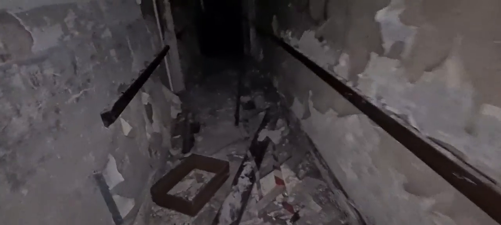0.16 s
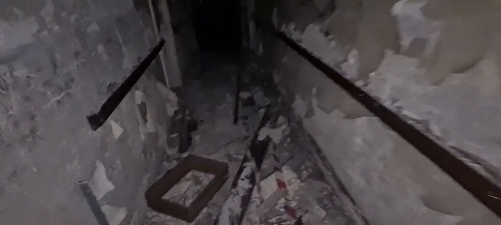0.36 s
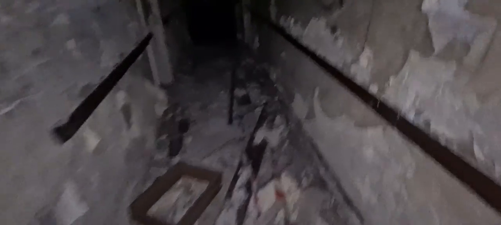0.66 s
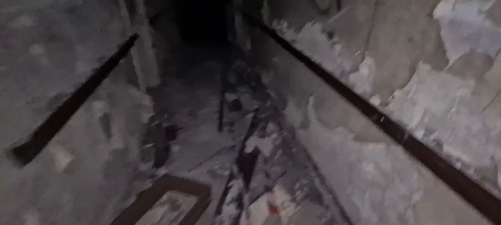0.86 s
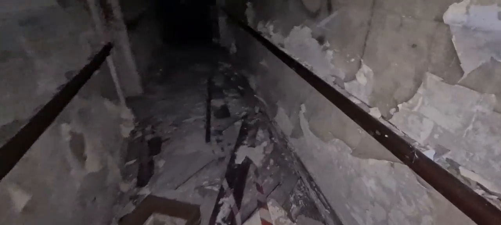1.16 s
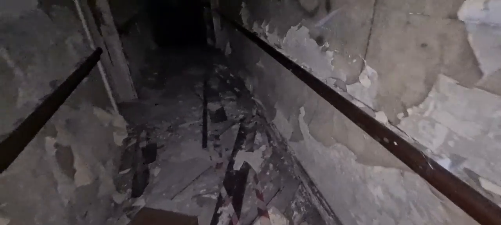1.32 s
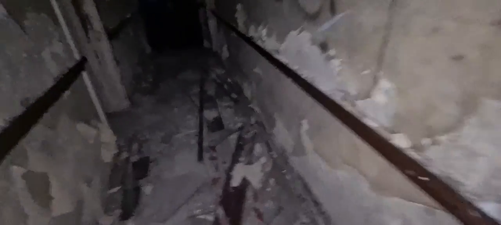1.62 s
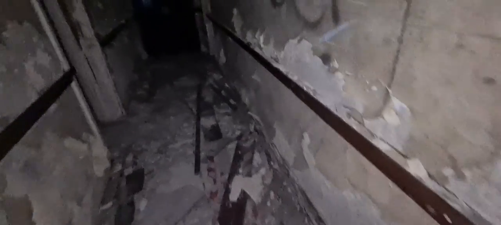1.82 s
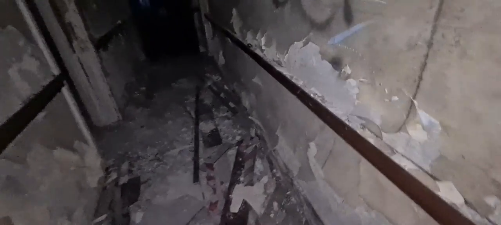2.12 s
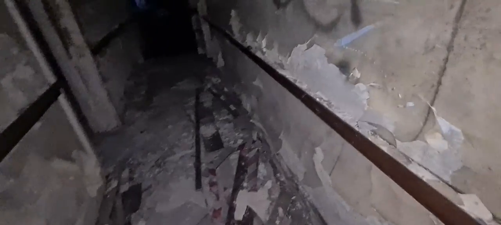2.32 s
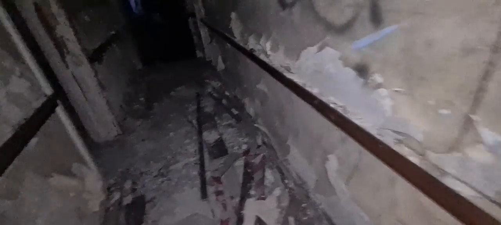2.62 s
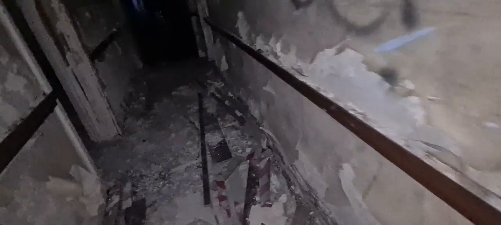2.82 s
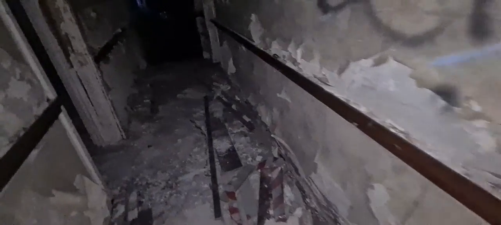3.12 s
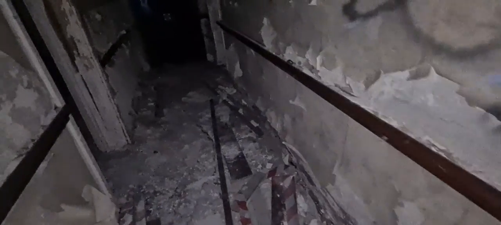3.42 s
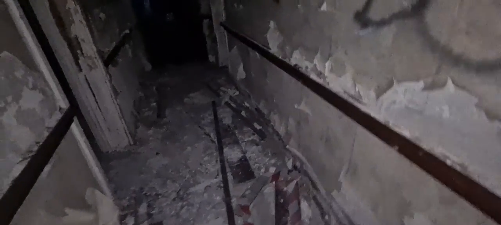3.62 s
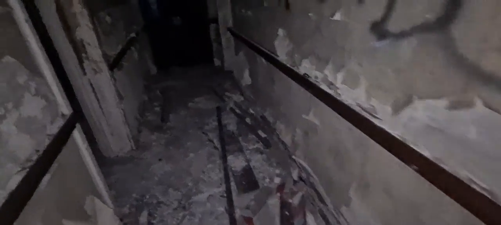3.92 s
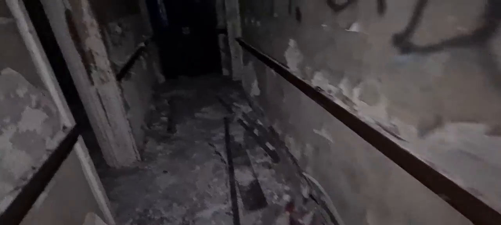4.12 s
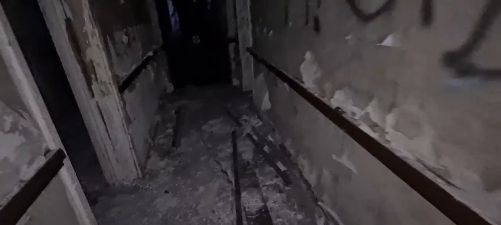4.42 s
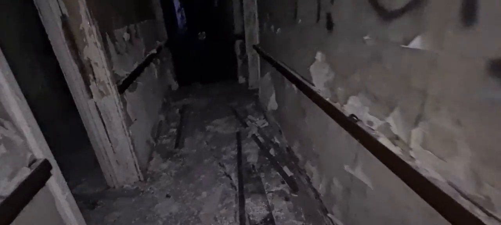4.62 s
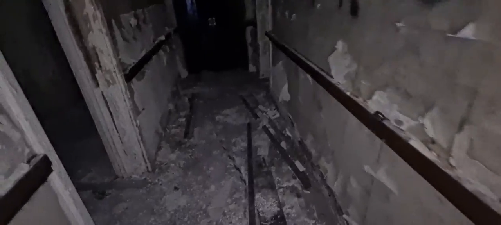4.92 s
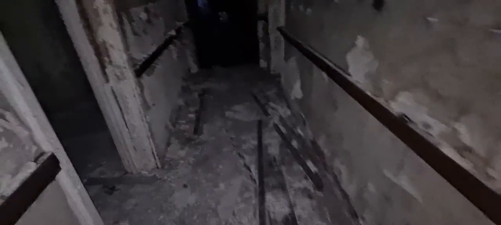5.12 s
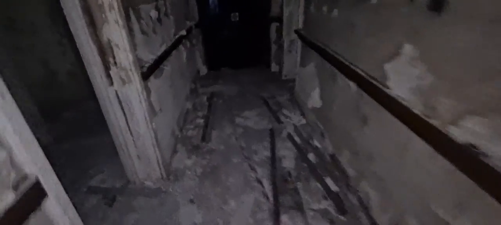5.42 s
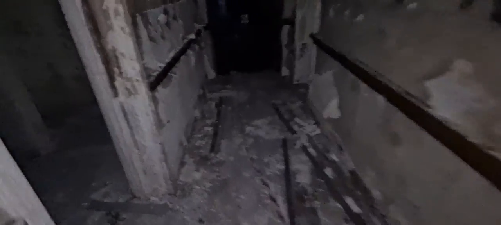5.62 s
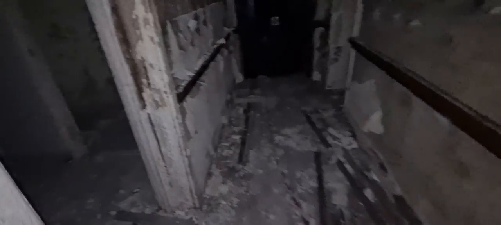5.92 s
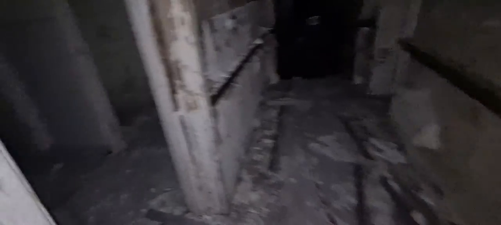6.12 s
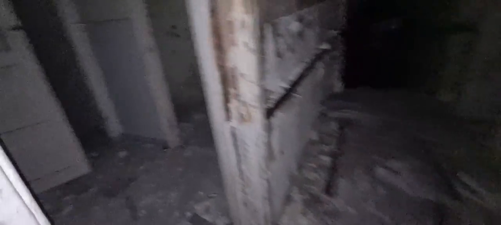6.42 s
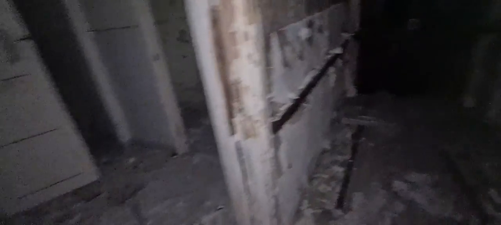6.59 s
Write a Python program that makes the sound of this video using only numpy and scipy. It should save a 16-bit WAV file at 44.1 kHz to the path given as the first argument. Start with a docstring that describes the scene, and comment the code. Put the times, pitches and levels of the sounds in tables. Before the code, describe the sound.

Shoes press and grind on crumbling debris, quiet at first, then heavier and louder, with sharp cracks and dull thuds between bare walls.

```python
"""Careful steps in a derelict corridor

Slow steps thud on a hollow floor: each thud is a fading low tone with noise and a dull heel bump.
Noise makes the floor's murmur and the air's hush. Plaster grinds as thousands of tiny fading tones.
Loose pieces knock and chips tick as short tones; flakes snap as ringing clicks. Bare walls add echoes."""
import sys
import numpy as np
from scipy import signal
from scipy.io import wavfile

SR = 44100
rng = np.random.default_rng(int(sys.argv[2]) if len(sys.argv) > 2 else 0)


def dump(signal):
    """Clip the signal to [-1, 1] and save it as 16-bit WAV at the path in sys.argv[1]."""
    limited = np.clip(np.atleast_2d(signal).T, -1, 1)
    pcm = np.round(limited * 32767).astype(np.int16)
    wavfile.write(sys.argv[1], SR, pcm)


N = 297939  # length in samples

# Event levels below are relative: the functions add shared offsets to many of them.
# The sole pressing and sliding on debris. Each row: start in seconds, length in seconds,
# lump level in dB, flake level in dB, grit level in dB.
PRESSES = [(0.0, 0.0067, -52.5, -57.5, -63.5), (0.074, 0.14, -62, -62, -69.5),
           (0.365, 0.071, -48.5, -58.5, -75.5), (0.61, 0.097, -58, -68.5, -81),
           (0.78, 0.069, -64, -70, -81), (0.924, 0.025, -58.5, -72.5, -77), (1.284, .1, -50.5, -47.5, -51),
           (1.377, 0.055, -54.5, -50, -54), (1.5, 0.056, -66, -61.5, -65), (1.57, 0.056, -52, -57, -63.5),
           (1.75, 0.067, -67.5, -66.5, -70.5), (1.866, 0.16, -78, -65.5, -79),
           (2.009, 0.03, -58.5, -70, -74), (2.074, 0.035, -57, -63, -81), (2.117, 0.046, -48, -57, -65),
           (2.342, 0.11, -53.5, -61, -69), (2.494, 0.018, -59.5, -77, -67.5),
           (2.686, .1, -54.5, -71.5, -92), (2.799, 0.088, -47, -68, -98), (2.854, 0.056, -52, -52, -68),
           (2.93, 0.12, -56, -73, -79), (3.163, .025, -82, -63.5, -84), (3.326, 0.038, -58, -63, -82),
           (3.359, 0.1, -53.5, -60, -71.5), (3.906, .04, -61, -70.5, -84), (4.075, 0.12, -50, -65, -90),
           (4.185, 0.044, -56, -70, -97), (4.4, 0.22, -42, -53, -76.5), (4.546, 0.06, -41, -44.5, -70),
           (4.693, 0.043, -52, -81, -95), (4.862, 0.034, -54.5, -65, -93), (4.946, 0.044, -52, -56, -87.5),
           (4.975, 0.097, -48.5, -56.5, -69.5), (5.201, 0.056, -29, -45.5, -64.5),
           (5.232, 0.077, -31, -39.5, -62), (5.358, .05, -49, -55.5, -82), (5.571, 0.065, -75, -59.5, -78),
           (5.644, .05, -42.5, -64, -96), (5.808, 0.11, -47, -56, -74.5), (5.916, 0.033, -47, -61, -69),
           (5.966, 0.055, -51, -56, -80), (6.038, 0.083, -47.5, -53, -72.5),
           (6.203, 0.027, -54, -52, -57.5), (6.292, 0.14, -38.5, -48.5, -74),
           (6.378, 0.052, -41, -47.5, -60), (6.469, 0.033, -46.5, -57, -69), (6.513, 0.06, -50, -50, -56),
           (6.643, 0.11, -71, -57.5, -66)]
# What goes on between steps. Each row: time in seconds, rustle level in dB, floor murmur level in dB.
BETWEEN = [(0, -71, -68), (.45, -68, -63), (.58, -80, -74), (.85, -64.5, -80), (1.26, -82, -83),
           (1.6, -71, -66), (1.87, -80.5, -75), (2.2, -80, -57), (2.65, -77, -62.5), (2.95, -70.5, -54),
           (3.25, -78.5, -77.5), (3.48, -69.5, -53), (3.78, -75.5, -74), (4.25, -60, -53.5),
           (4.65, -69, -39), (5.1, -62, -49.5), (6.3, -68, -50.5), (6.76, -61, -60)]
# Tiny hard chips flicked aside. Each row: start in seconds, level in dB, pitch in Hz.
CHIPS = [(0.131, -63, 11700), (0.206, -58, 9700), (0.577, -73, 11600), (1.818, -64.5, 11000),
         (3.12, -64.5, 9800), (3.302, -70, 14000), (4.368, -73, 8600)]
# Loose boards and lumps knocking. Each row: start in seconds, level in dB, pitch in Hz,
# basic ring time in seconds (PIECE_TONES scales it for each tone).
KNOCKS = [(0.263, -40, 460, 0.028), (0.381, -31, 457, 0.045), (0.793, -42.5, 740, 0.038),
          (1.334, -36.5, 490, 0.078), (1.594, -51, 274, 0.16), (2.129, -34, 267, 0.033),
          (2.696, -33, 445, 0.014), (2.819, -32, 624, 0.083), (2.876, -23, 740, 0.016),
          (3.943, -29.5, 337, 0.031), (4.586, -39, 380, 0.056), (4.967, -36, 632, 0.23),
          (5.246, -19, 380, 0.06), (5.281, -19.5, 386, 0.022), (5.305, -36, 790, 0.047),
          (6.504, -41, 815, 0.2)]
# The tones in a knocked piece. Each row: multiple of its pitch, level in dB, share of its ring time.
PIECE_TONES = [(0.722, -9, 1.27), (1, 1, 0.74), (1.17, -17.5, 0.55), (1.55, -15.5, 0.43), (2.5, -23, 0.32)]
# Plaster flakes snapping. Each row: start in seconds, level in dB, fine splinter level in dB,
# pitch in Hz, left-minus-right balance in dB.
SNAPS = [(0.39, -44, -86, 1700, -1), (0.687, -42.5, -87, 1510, -6.5), (1.2895, -42.5, -80, 1750, -5),
         (1.3396, -33, -60, 2390, -2), (1.3608, -34, -61, 2460, 4), (1.501, -47.5, -74, 1550, -9),
         (1.6296, -41, -73, 2050, -2), (1.803, -58, -79, 2320, -3), (2.0316, -44.5, -86, 2030, -4),
         (2.1301, -41, -52, 2000, -4), (2.3496, -49.5, -77, 1800, -9), (2.396, -37, -60, 1850, -22),
         (2.4059, -23.5, -46.5, 2150, -2), (2.8706, -38, -61.5, 2030, -9), (2.8827, -29, -75, 1550, -3),
         (3.172, -46.5, -80.5, 2070, -4), (3.2991, -46, -72, 1790, -7), (3.342, -45, -82, 1870, -4),
         (4.1318, -48.5, -86, 1010, -6), (4.2045, -41.5, -91, 1780, -7.5), (4.2495, -48.5, -88, 2200, -2),
         (4.4222, -43, -81.5, 1130, -14.5), (4.572, -33, -73, 1450, -7), (4.593, -33.5, -58, 2770, 2),
         (5.186, -44, -85, 2190, -10), (5.21, -28.5, -68, 2140, -6), (5.2682, -32, -70, 1010, -7),
         (5.2826, -22.5, -72, 2010, -2.5), (5.528, -48.5, -90, 2600, 1), (5.6458, -37, -76, 1760, -6),
         (5.8436, -41, -80, 2020, -4), (5.9219, -37.5, -58, 1660, -5.5), (6.217, -42.5, -42.5, 2100, 2),
         (6.3241, -42, -79, 1770, -4), (6.3901, -36.5, -53.5, 1840, 11)]
# Weight landing on the floor. Each row: start in seconds, level in dB, pitch of that spot in Hz,
# time to fade by 60 dB in seconds.
THUDS = [(0.423, -43, 67.6, 0.3), (0.646, -47.5, 67.9, 0.47), (0.677, -45, 72, 0.22),
         (0.931, -52.5, 106, .15), (1.906, -62, 120, .3), (1.998, -51.5, 141, 0.53),
         (2.142, -41.5, 49.6, 0.34), (2.404, -38.5, 115, 0.057), (2.711, -49, 86, 0.89),
         (2.82, -33, 102, 0.22), (2.867, -32, 54.6, 0.4), (2.901, -43.5, 47.5, 0.58),
         (3.389, -33, 94, 0.27), (3.412, -37.5, 55.8, 0.67), (3.43, -43, 134.9, 0.3),
         (3.935, -49, 108, 0.35), (4.069, -33.5, 98.5, 0.35), (4.448, -33.5, 88.5, 1),
         (4.519, -20, 77.6, 0.49), (4.713, -27.5, 77.6, 0.35), (4.969, -37, 155.6, 0.3),
         (5.205, -37, 176.2, 0.87), (5.265, -28.5, 149.5, 0.38), (5.418, -30.5, 57.7, 0.16),
         (5.552, -43.5, 56.7, 0.55), (5.663, -46, 68, 0.15), (5.836, -37.5, 144.2, 0.59),
         (5.921, -34, 68, .4), (5.977, -27.5, 120, 0.042), (6.06, -35.5, 157.7, .28), (6.217, -35, 61, .12),
         (6.296, -35, 164.2, 0.84), (6.353, -26, 152, 0.32), (6.573, -39.5, 163.2, 0.25)]

# Spectrum shapes; only differences within a table matter. Each row: frequency in Hz, level in dB per Hz.
AIR_COLOUR = [(25, 2.5), (80, -14), (250, -2), (500, -17), (1000, -15.5), (2000, -20.5), (2900, -28),
              (4300, -18.5), (5900, -31.5), (7000, -49.5), (11600, -33.5), (16000, -39)]  # still air and microphone hiss
LUMP_COLOUR = [(110, -33.5), (190, 1), (255, -2.5), (303, 1.5), (345, -4.5), (385, 1.5), (418, -5.5),
               (447, 2.5), (480, -0.5), (600, -3), (790, -8.5), (1050, -17), (1800, -54.5)]
FLAKE_COLOUR = [(450, -5), (880, -6.5), (1060, 0), (1200, 0.5), (1550, -1.5), (1900, 4.5), (2300, -3),
                (2650, -5.5), (3800, -7), (4800, -13), (5900, -30), (6900, -46), (10000, -25)]
GRIT_COLOUR = [(1500, -45.5), (3200, 5.5), (4700, 8), (6000, 3.5), (7100, -12), (8600, -3.5), (10000, -6),
               (11300, -0.5), (13000, -8.5), (16000, -8)]
FLOOR_COLOUR = [(18, -17), (35, -7.5), (65, -0.5), (85, -2), (115, -3), (155, -5), (210, -19), (330, -22),
                (700, -90.5)]
CRACK_COLOUR = [(300, 12), (800, 13), (1300, 0.5), (2200, 3.5), (3000, -1.5), (4600, 3), (5900, -1),
                (6900, -29), (10000, -31)]  # the body of a snapping flake
HEEL_COLOUR = [(70, -43.5), (130, 1.5), (170, 9), (230, 4.5), (310, -0.5), (500, -1), (1000, -69)]  # the dull bump of a heel
# How echoes fade by 60 dB. Each row: frequency in Hz, time for the near walls in seconds,
# time for the rooms beyond in seconds.
CORRIDOR = [(76, 0.033, 1), (400, 0.19, 0.58), (1970, 0.21, 0.42), (6000, 0.12, 0.23), (14700, 0.22, 0.72)]

AIR_DB = -73.5
RISE_SHARE = .4  # the load grows over this share of a press, then holds
RELEASE_DB_PER_S = 258.5  # the crunch stops quickly once the foot rests
TAIL_DB, TAIL_DB_PER_S = -12.5, 85  # then the room's faint echo of the crunch fades more slowly
FLAKE_BALANCE_DB = -2  # left minus right: the crunch leans slightly right
FLAKE_CYCLES = 1.3  # a snapped flake's ring falls to about 37 % in this many cycles
LOAD_CYCLES = .8  # a thud builds up over this many swings of the floor
EDGE_HZ = 15900  # upper edge of the final sound


def amp(db):
    """Turns decibels into gain."""
    return 10 ** (np.asarray(db) / 20)


def balance(db):
    """Gives left and right gains whose difference is db; positive leans left."""
    return amp(db * np.array([[.5], [-.5]]))


def fade(t, t60):
    """Fades smoothly, by 60 dB in t60 seconds."""
    return np.exp(-np.log(1000) * t / t60)


def evened(x):
    """Scales the average strength (rms) to 1."""
    return x / np.sqrt(np.mean(x ** 2) + 1e-20)


def read(points, hz, axis=1):
    """Reads a table column between its rows, along log frequency."""
    table = np.array(points)
    return np.interp(np.log(hz + 1), np.log(table[:, 0] + 1), table[:, axis])


def curve(rows, axis=1):
    """Reads a table column between its rows, along time."""
    table = np.array(rows)
    return np.interp(np.arange(N) / SR, table[:, 0], table[:, axis])


def add(mix, s, sound):
    """Lays a sound into the mix at time s, cutting off what runs past the end."""
    start = max(round(s * SR), 0)
    part = mix[..., start:][..., :sound.shape[-1]]
    part += sound[..., :part.shape[-1]]


def colour(x, points, size=8192):
    """Shapes a spectrum with a filter of energy 1 that only rings after its input."""
    log_gain = np.log(amp(read(points, abs(np.fft.fftfreq(size, 1 / SR)))))
    minimum_phase = np.conj(signal.hilbert(log_gain))
    ring = np.fft.ifft(np.exp(minimum_phase)).real[:size // 2]
    ring = ring[None] / np.linalg.norm(ring)
    return signal.oaconvolve(np.atleast_2d(x), ring, axes=1)[:, :N]


def corridor(x, near_db, far_db, lag=0., first_s=.0025, early_per_s=250, growth=30000):
    """Adds wall echoes that crowd into a tail; the direct sound goes to one channel only."""
    delay = np.arange(SR) / SR
    density = np.minimum((early_per_s + growth * delay) / SR, 1)  # chance of an echo per sample
    taps = rng.choice([-1, 1], (2, 2, SR)) * (rng.random((2, 2, SR)) < density)
    taps = taps * (delay > first_s) / np.sqrt(density)
    # each frequency fades at its own speed, for near walls and for rooms beyond
    hz, t, z = signal.stft(taps, SR, nperseg=256)
    t60 = np.array([read(CORRIDOR, hz, axis=1), read(CORRIDOR, hz, axis=2)])[:, None, :, None]
    tails = signal.istft(z * fade(t, t60), SR, nperseg=256)[1]
    near, far = tails / np.linalg.norm(tails, axis=-1, keepdims=True)
    echo = amp(near_db) * near + amp(far_db) * far
    direct_channel = int(lag < 0)  # right for a negative lag, otherwise left
    echo[direct_channel, round(abs(lag) * SR)] += 1  # direct sound, lag in seconds
    echo = echo / np.linalg.norm(echo[0])
    return signal.fftconvolve(np.atleast_2d(x), echo, axes=1)[:, :N]


def air(mirrored=0.1):
    """The empty building's faint steady hush is shaped noise, a little of it shared between channels."""
    hush = colour(rng.standard_normal((2, N)), AIR_COLOUR)
    return amp(AIR_DB) * (hush + mirrored * hush[::-1])


def pressure(axis):
    """Gain of one size of debris: every press rises, holds, lets go and leaves a slow, faint tail."""
    t, power = np.arange(SR) / SR, np.zeros(N)
    for row in PRESSES:
        s, length = row[:2]
        rise = np.minimum(t / (RISE_SHARE * length), 1)
        after = np.maximum(t - length, 0)
        release = amp(-RELEASE_DB_PER_S * after)
        tail = amp(TAIL_DB - TAIL_DB_PER_S * after)
        fall = np.maximum(release, tail)
        add(power, s, (amp(row[axis]) * rise * fall) ** 2)  # overlaps add as power
    return np.sqrt(power)


def grains(spectrum, low_hz, high_hz, per_s, cycles, spread_db, near_db, clump_db=1.0, clump_s=.018):
    """Clumps of tiny fractures under heel and toe, each with its own size, pitch and length of ring."""
    t, out = np.arange(600) / SR, np.zeros((2, N))
    knots = np.arange(0, N / SR, clump_s)
    clumps_db = clump_db * rng.standard_normal(len(knots))
    for lag in (-.00035, .0001):  # seconds; one train of grains for each
        when, pitch, size, sign, hardness = rng.random((int(per_s * N / SR), 5)).T
        hz = (low_hz + (high_hz - low_hz) * pitch)[:, None]
        # most crumble dully, a few hard chips ring
        damping = hz / (cycles * 10 ** hardness[:, None] ** 2)
        size_db = spread_db * np.minimum(-np.log(size), 4)
        size_db = size_db + np.interp(when * N / SR, knots, clumps_db)
        rings = np.sin(2 * np.pi * hz * t) * np.exp(-damping * t) * np.sqrt(damping)
        rings *= (np.sign(sign - .5) * amp(size_db))[:, None]
        at = (when * N).astype(int)[:, None] + np.arange(len(t))
        train = np.bincount(at.ravel(), rings.ravel(), N)[:N]  # sums all grains sample by sample
        out += corridor(train, near_db, near_db - 10.5, lag)
    return evened(colour(out, spectrum))


def grinding(lumps_db=0, flakes_db=1, grit_db=0, idle_lumps_db=3, idle_flakes_db=-2, idle_grit_db=-14):
    """Lumps roll, flakes crunch and grit hisses as the sole presses; a faint rustle goes on between steps."""
    lumps = grains(LUMP_COLOUR, low_hz=170.6, high_hz=1222, per_s=350, cycles=1,
                   spread_db=2.0, near_db=-1.5)
    flakes = grains(FLAKE_COLOUR, low_hz=599, high_hz=6734, per_s=600, cycles=1.44,
                    spread_db=3.5, near_db=2.5)
    grit = grains(GRIT_COLOUR, low_hz=2450, high_hz=16200, per_s=830, cycles=11.0,
                  spread_db=2.0, near_db=12)
    lumps = 0.6 * lumps + 0.26 * lumps[::-1]  # long waves reach both channels more alike
    idle = curve(BETWEEN, axis=1)
    # presses and rustle add as power
    lumps = lumps * np.hypot(pressure(axis=2) * amp(lumps_db), amp(idle + idle_lumps_db))
    flakes = flakes * np.hypot(pressure(axis=3) * amp(flakes_db), amp(idle + idle_flakes_db))
    grit = grit * np.hypot(pressure(axis=4) * amp(grit_db), amp(idle + idle_grit_db))
    return lumps + flakes * balance(FLAKE_BALANCE_DB) + grit * balance(1.4)


def floor_noise(apart):
    """Gives the floor's low noise as a shared part and a part that is opposite in the two channels."""
    shared, unlike = colour(rng.standard_normal((2, N)), FLOOR_COLOUR)
    return shared, apart * np.outer([1, -1], unlike)


def sway(press_db=-10, idle_db=-2):
    """The hollow floor murmurs under the moving weight, more where lumps roll, nearly alike in both channels."""
    shared, unlike = floor_noise(apart=.08)
    idle = amp(curve(BETWEEN, axis=2) + idle_db)
    gain = np.hypot(pressure(axis=2) * amp(press_db), idle)
    return gain * (shared + unlike)


def chips(level_db=14, ring_s=0.00048, balance_db=4):
    """Tiny hard chips land with a thin, high tick: a tone that dies almost at once."""
    t, out = np.arange(SR // 50) / SR, np.zeros(N)
    for s, db, hz in CHIPS:
        tick = np.sin(2 * np.pi * hz * t) * np.exp(-t / ring_s)
        add(out, s, amp(db + level_db) * tick)
    return corridor(out, near_db=0.5, far_db=-9.5) * balance(balance_db)


def knocks(level_db=3, contact_s=0.00068):
    """Loose pieces tip and hit the floor with a short hollow ring made of several fading tones."""
    t, out = np.arange(SR // 3) / SR, np.zeros(N)
    for s, db, hz, t60 in KNOCKS:
        ring = np.zeros(len(t))
        for multiple, tone_db, share in PIECE_TONES:
            tone = np.sin(2 * np.pi * hz * multiple * t)
            ring += amp(tone_db) * tone * fade(t, t60 * share)
        softened_start = 1 - np.exp(-t / contact_s)
        add(out, s, amp(db + level_db) * ring * softened_start)
    wet = corridor(out, near_db=-2, far_db=-9)
    return 0.55 * wet + 0.28 * wet[::-1]  # blends the two channels


def snaps(level_db=15, splinter_db=23, crumble=0.24, crumble_s=0.0022, near_db=-2, far_db=-10):
    """A flake breaks with one sharp click, a cycle or two of ring and a few milliseconds of crumbling."""
    t = np.arange(SR // 16) / SR
    body, fine = np.zeros((2, 2, N))
    for s, db, fine_db, hz, balance_db in SNAPS:
        sparse = rng.random(len(t)) < .1
        crack = crumble * rng.standard_normal(len(t)) * sparse * np.exp(-t / crumble_s)
        crack[0] = 1  # the sharp click
        ring = np.cos(2 * np.pi * hz * t) * np.exp(-hz * t / FLAKE_CYCLES)
        flake = signal.fftconvolve(crack, ring / np.linalg.norm(ring))
        sides = balance(balance_db)
        add(body, s, flake * sides * amp(db + level_db))
        add(fine, s, crack * sides * amp(fine_db + splinter_db))
    broken = colour(body, CRACK_COLOUR) + colour(fine, GRIT_COLOUR)
    return corridor(broken, near_db, far_db, lag=.00007, early_per_s=410)


def thuds(scatter=0.26, octave_db=-20, level_db=4, heel_db=-15, heel_s=0.018):
    """The heel bumps, the floor swings at its local pitch and neighbouring boards shudder with it."""
    t, out = np.arange(SR) / SR, np.zeros((2, N))
    shared, unlike = floor_noise(apart=0.056)
    shudder = scatter * shared + unlike
    bumps = amp(heel_db) * colour(rng.standard_normal(N), HEEL_COLOUR)
    for s, db, hz, t60 in THUDS:
        turn = 2 * np.pi * hz * t
        now = (round(s * SR) + np.arange(SR)) % N  # the stretch of noise used here
        swing = np.sin(turn) + amp(octave_db) * np.sin(2 * turn)
        swing = (swing + shudder[:, now]) * fade(t, t60)
        bump = bumps[:, now] * np.exp(-t / heel_s)
        build_up = np.minimum(t * hz / LOAD_CYCLES, 1)
        add(out, s, amp(db + level_db) * (swing + bump) * build_up)
    return out


def scene():
    """Everything the feet do, over the hush."""
    return air() + grinding() + sway() + chips() + knocks() + snaps() + thuds()


def record(dry):
    """The recorder's band limit: a filter removes what lies above EDGE_HZ."""
    low_pass = signal.firwin(511, EDGE_HZ, window=("kaiser", 9), fs=SR)
    return signal.oaconvolve(dry, low_pass[None], "same")


dry = scene()
out = record(dry)
dump(out)
```